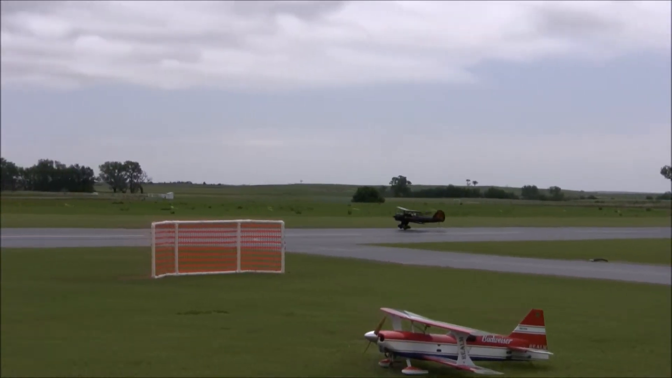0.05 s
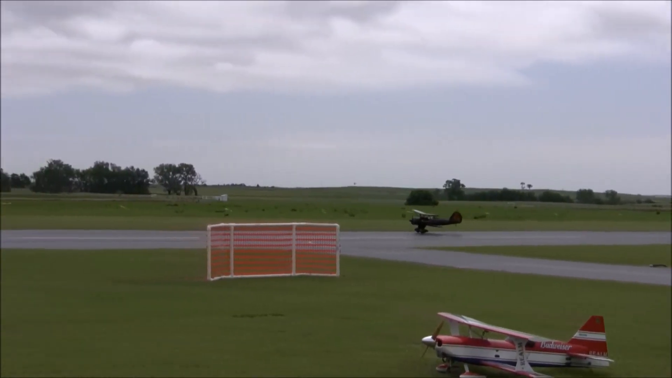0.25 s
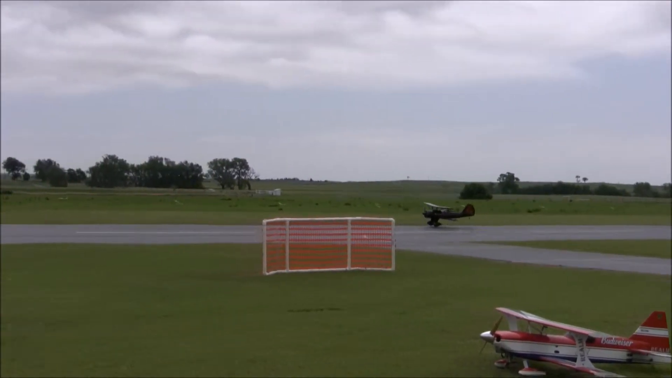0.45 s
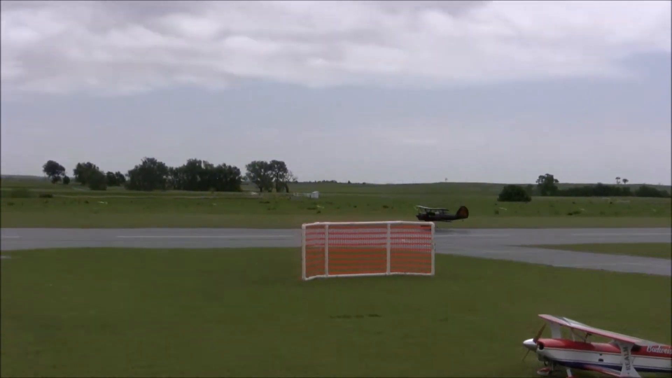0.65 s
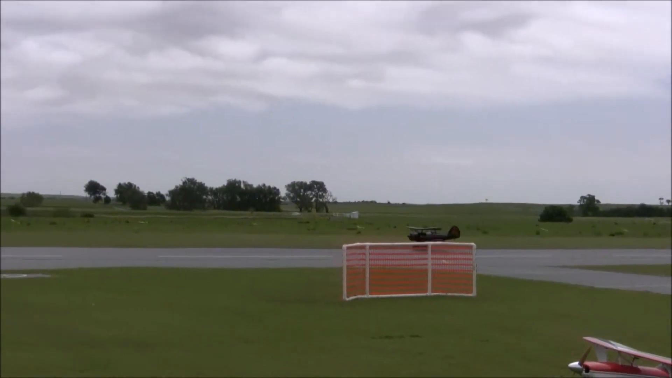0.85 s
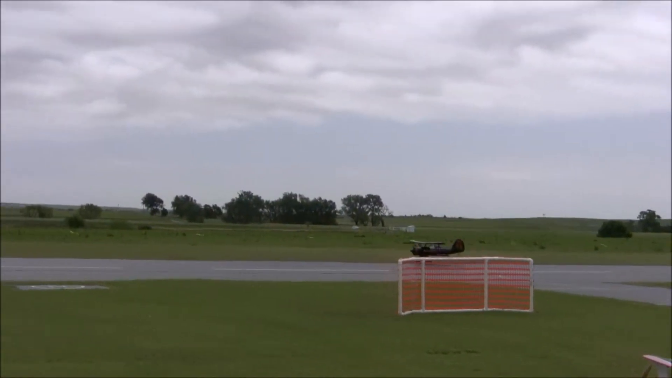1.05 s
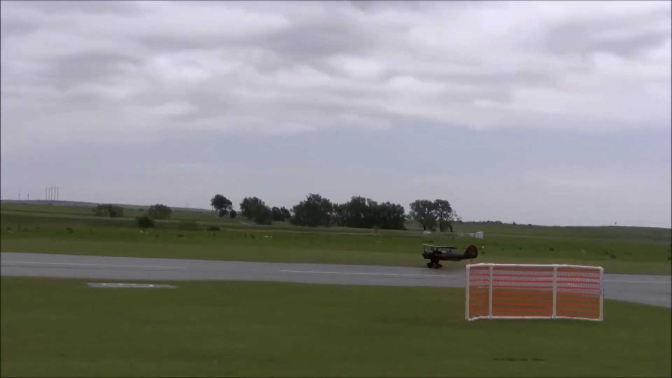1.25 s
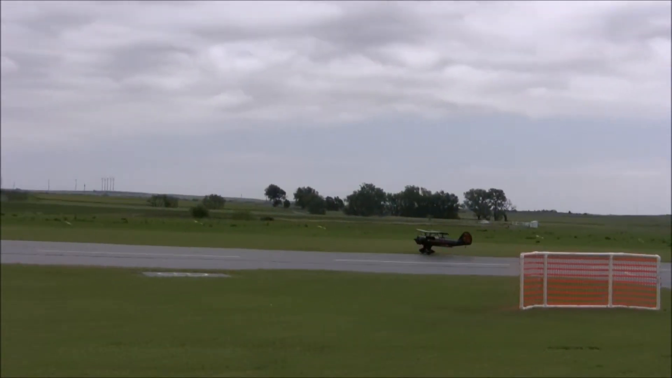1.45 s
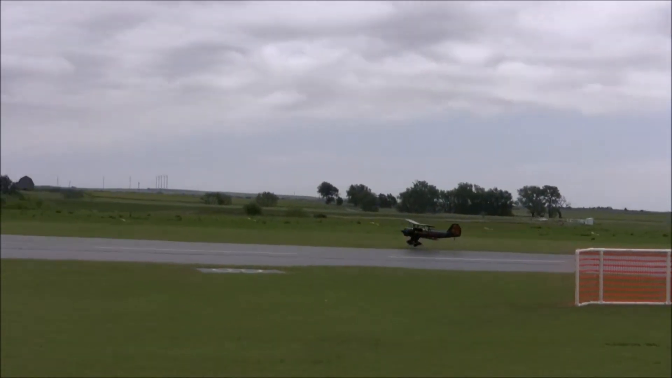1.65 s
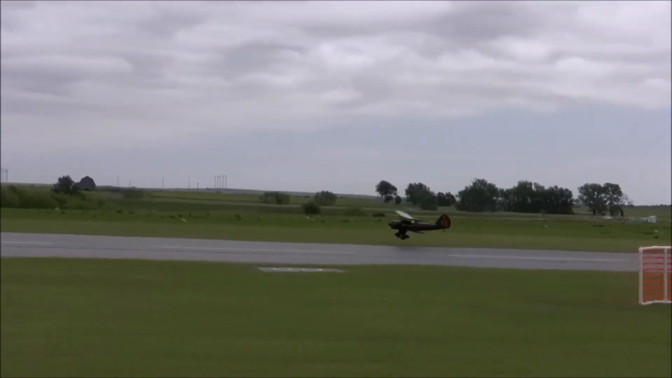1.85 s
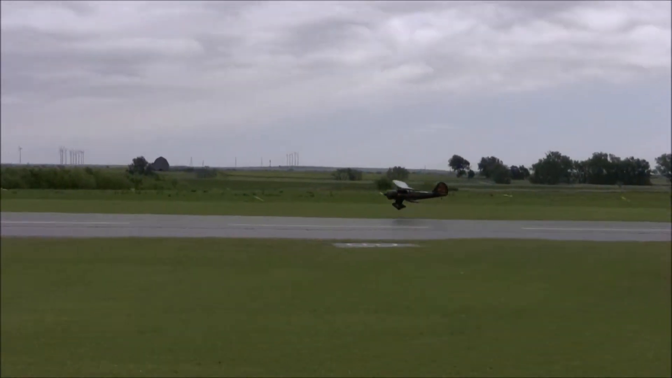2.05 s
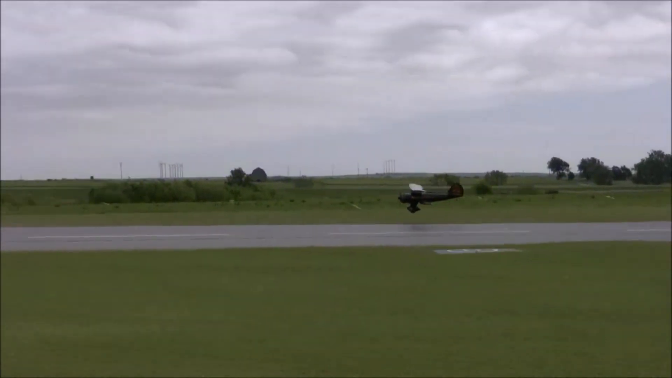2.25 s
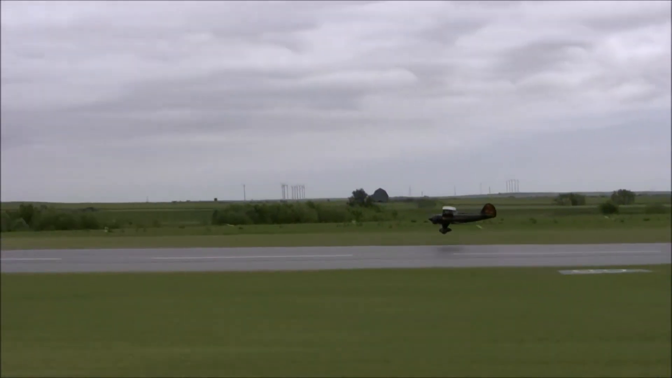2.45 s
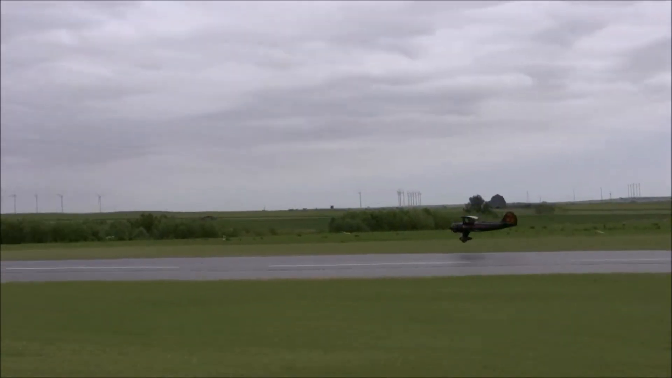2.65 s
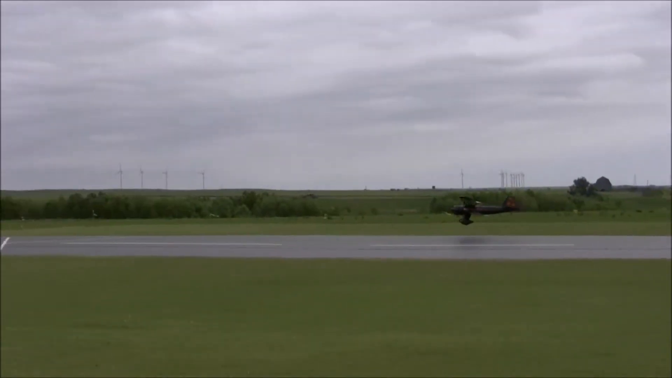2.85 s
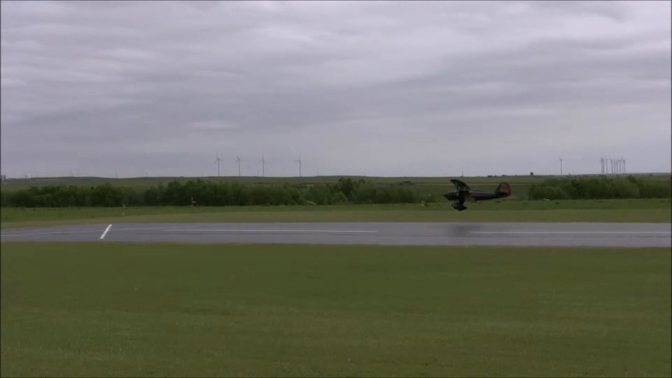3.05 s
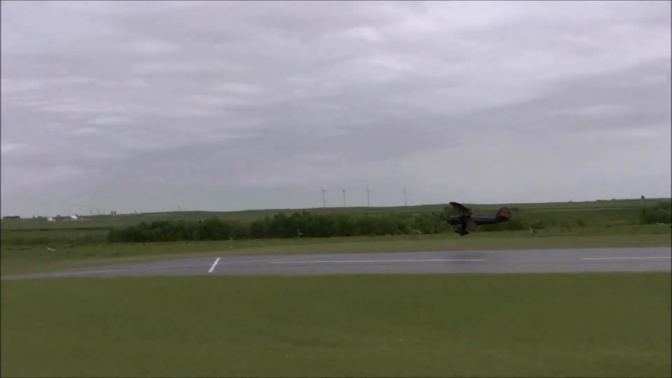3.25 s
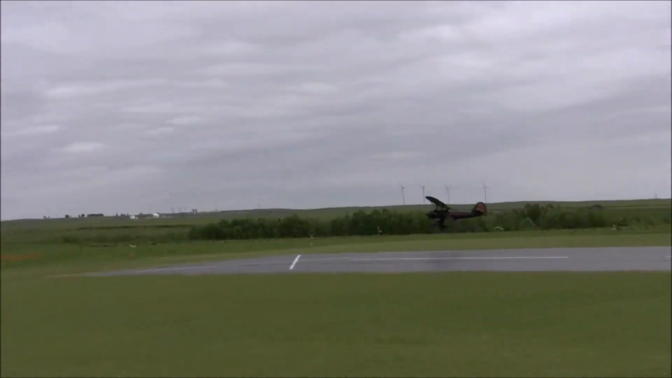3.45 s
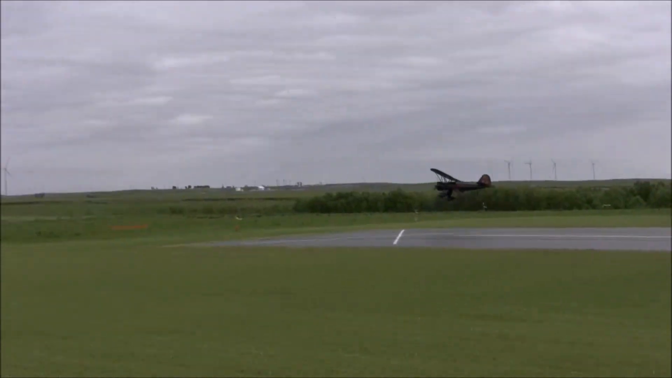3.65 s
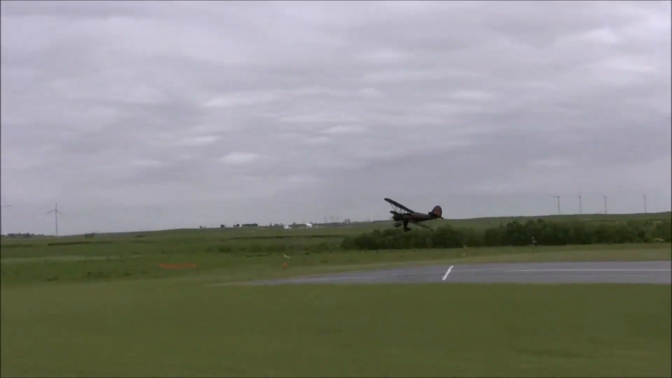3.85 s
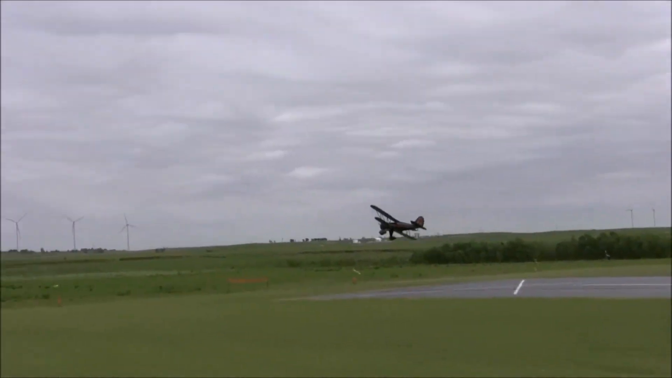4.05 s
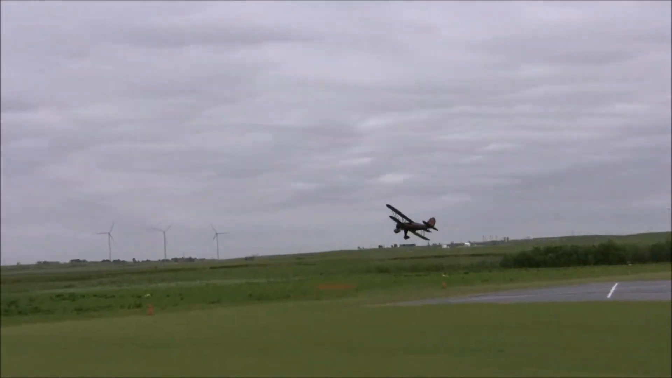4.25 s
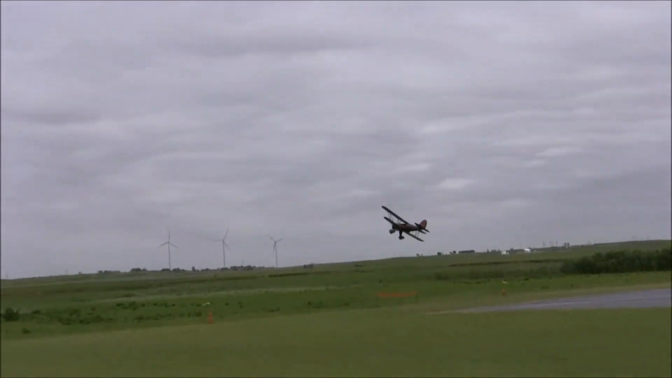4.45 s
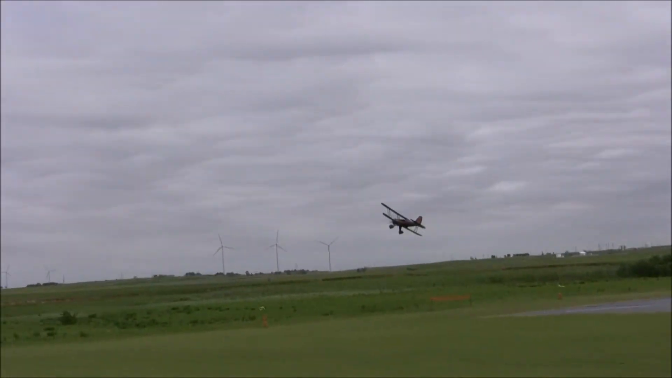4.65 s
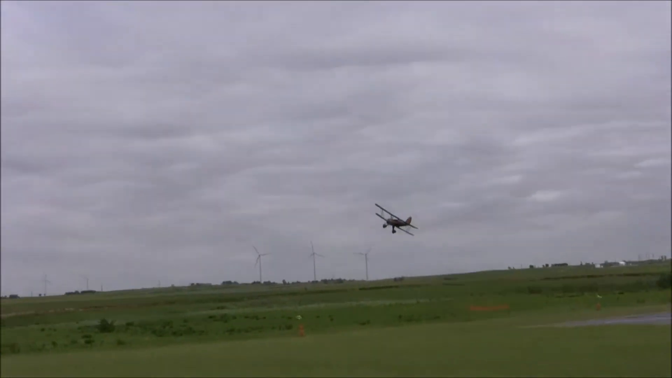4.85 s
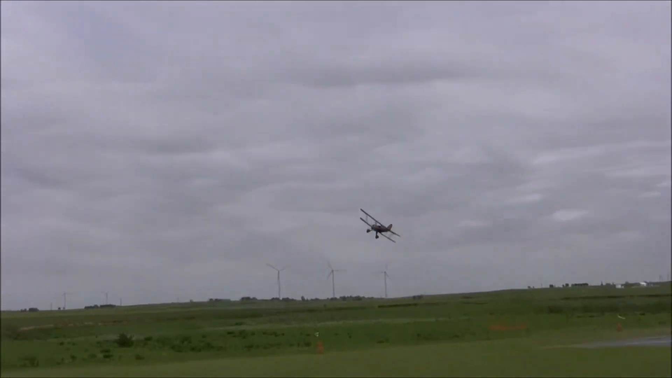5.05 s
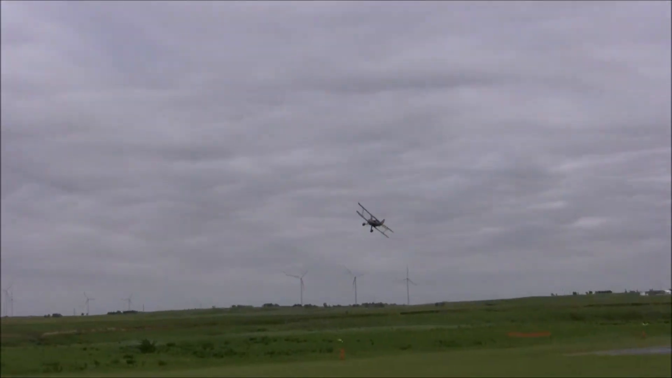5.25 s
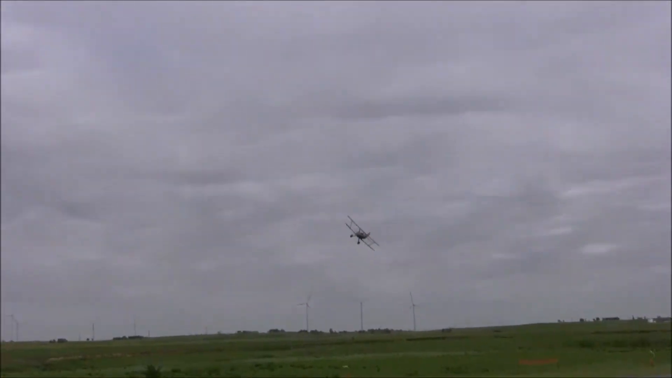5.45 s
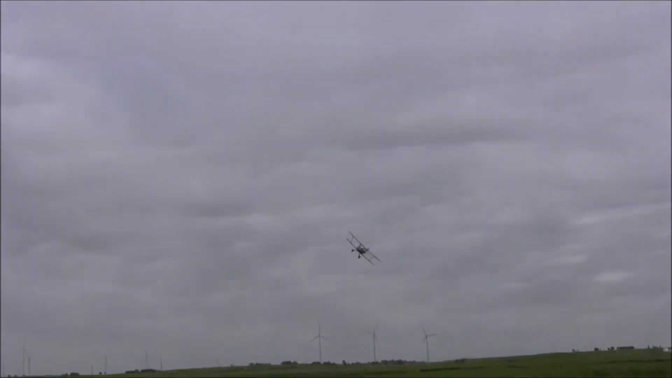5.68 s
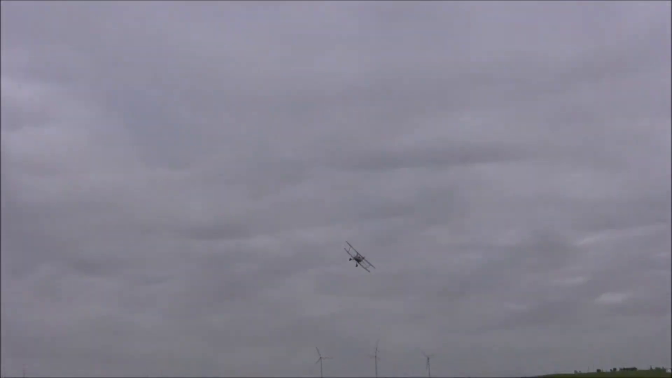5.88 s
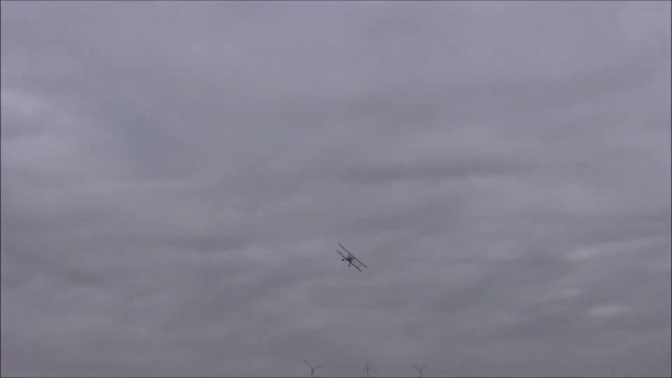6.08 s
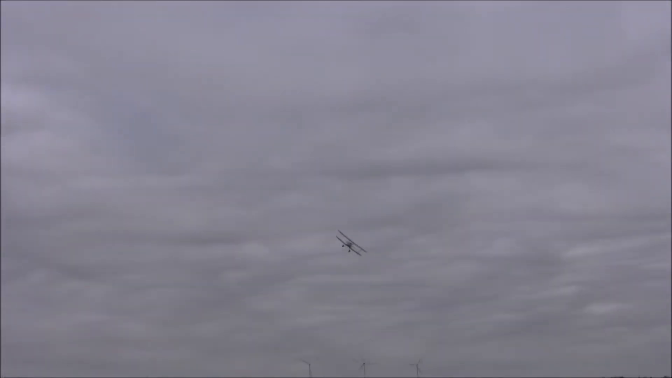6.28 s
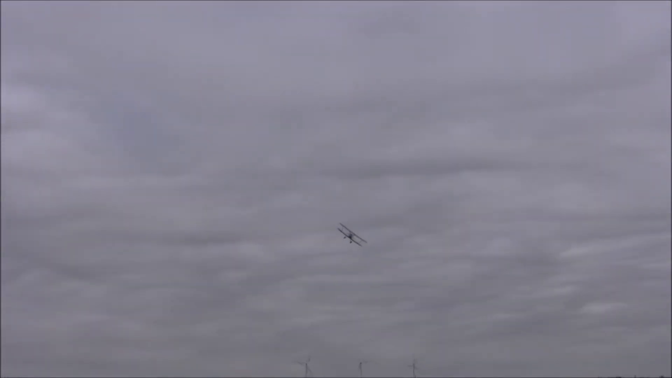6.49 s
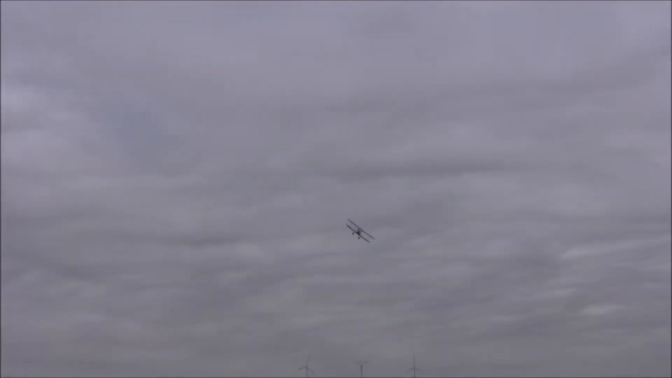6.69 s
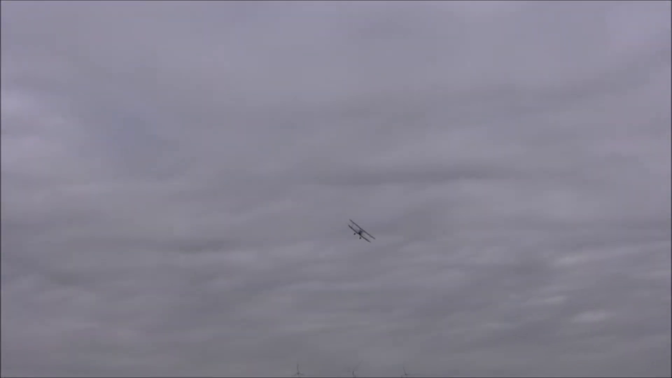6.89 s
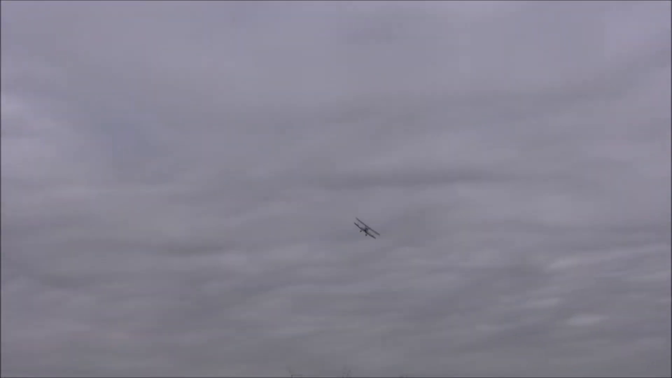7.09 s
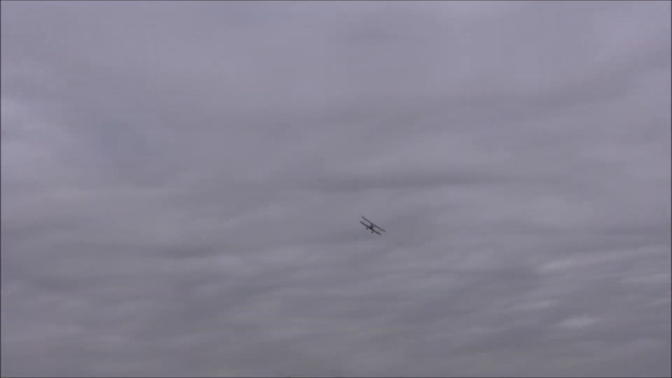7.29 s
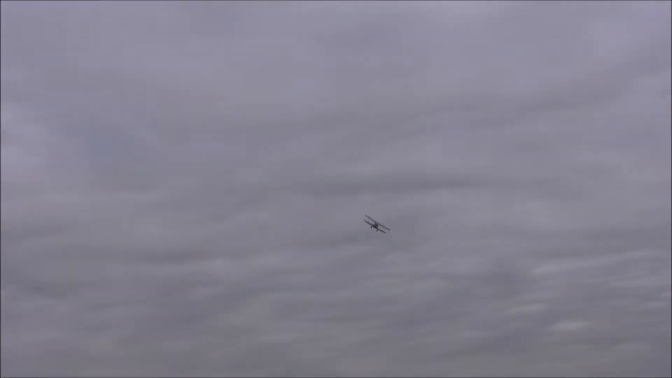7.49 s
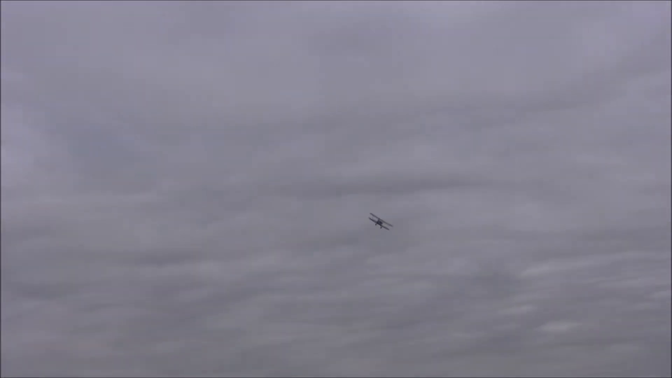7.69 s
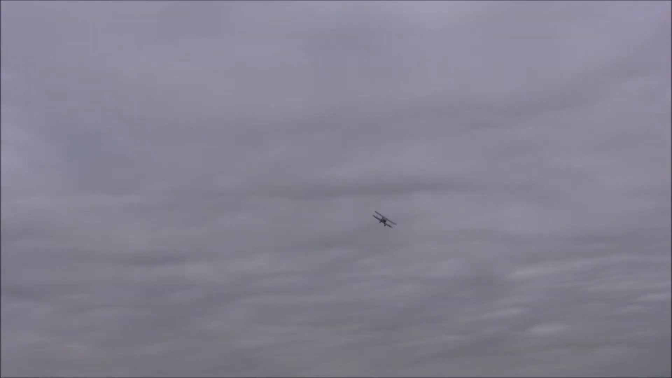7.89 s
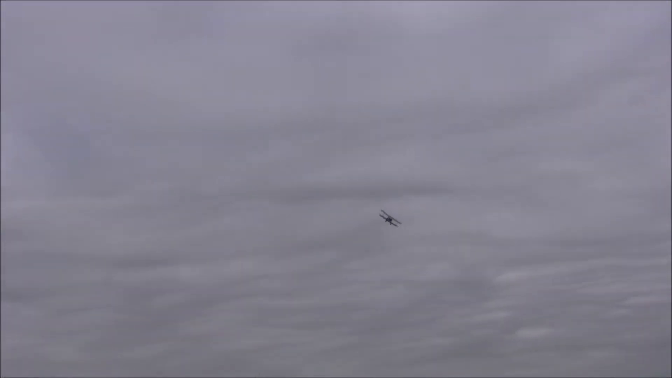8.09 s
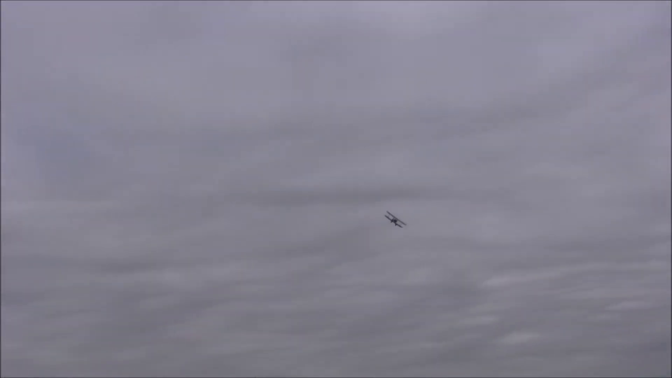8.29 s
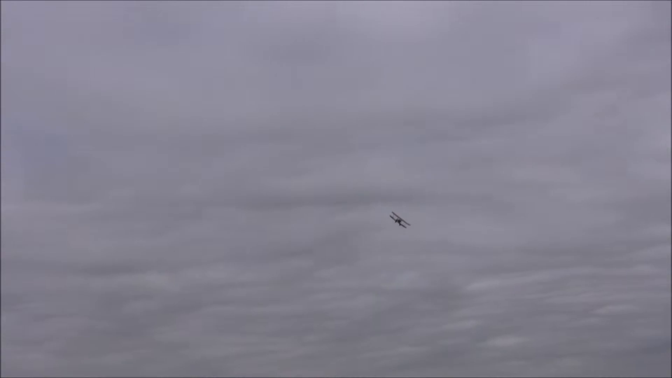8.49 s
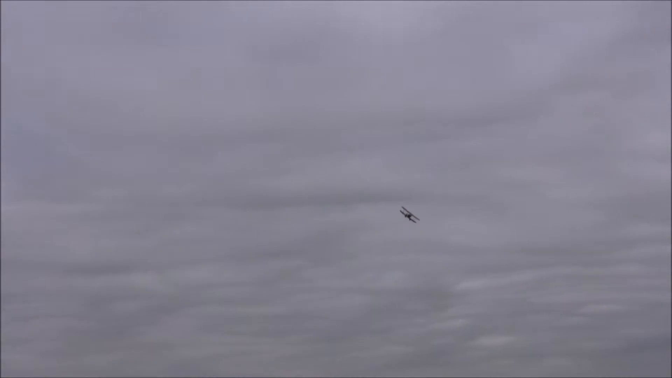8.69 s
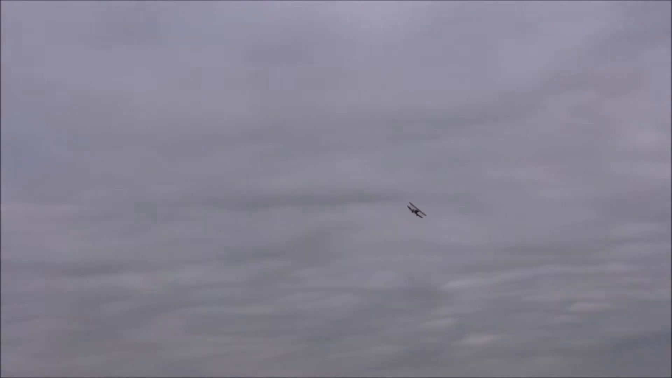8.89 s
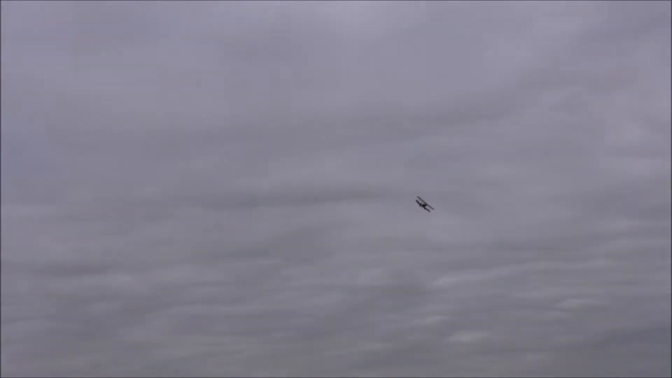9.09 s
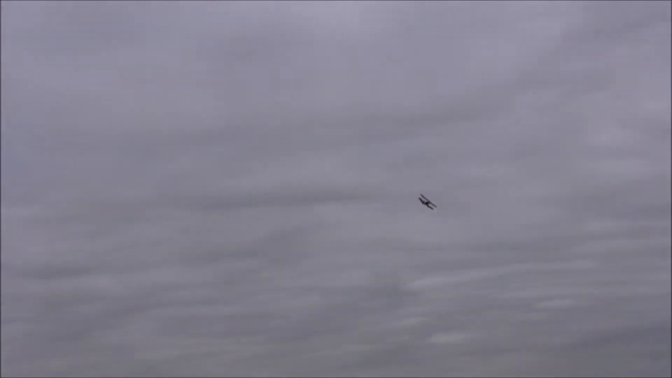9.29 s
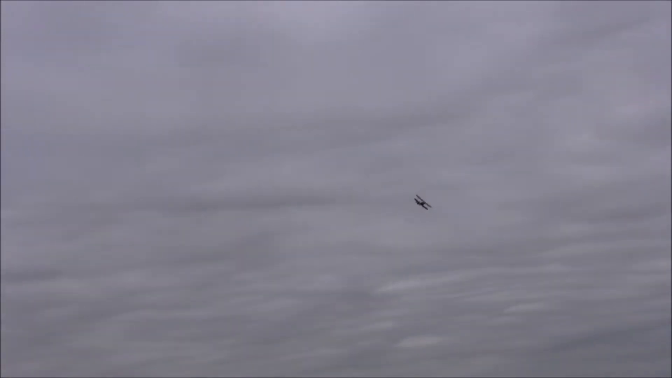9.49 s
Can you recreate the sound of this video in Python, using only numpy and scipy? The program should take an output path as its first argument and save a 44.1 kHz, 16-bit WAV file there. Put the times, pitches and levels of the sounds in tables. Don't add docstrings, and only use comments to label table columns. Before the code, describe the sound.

Outdoors on an open field, wind buffets the microphone while a small single-cylinder petrol engine putters faintly. Within a second it revs to a fast, steady buzz. The model plane rolls and lifts off, its raspy crackle and propeller drone loudest around three to five seconds, then it recedes to a thin hum under low lumpy wind rumble. One handheld stereo microphone near the runway.

```python
import sys
import numpy as np
from scipy import signal
from scipy.fft import rfft, irfft, next_fast_len
from scipy.io import wavfile
from scipy.ndimage import uniform_filter1d

SR = 44100
rng = np.random.default_rng(int(sys.argv[2]) if len(sys.argv) > 2 else 0)


def how_loud(loudness_db):
    steps = np.asarray(loudness_db, float) / 20
    return 10 ** steps


def dump_mix(stems):
    frames = np.atleast_2d(stems).T
    limited = np.clip(frames, -1, 1)
    pcm = np.round(limited * 32767).astype(np.int16)
    wavfile.write(sys.argv[1], SR, pcm)


N = 420273

# time in seconds [s], level [dB].
HUSH_DB = [(0, -40), (1.4, -39), (2.5, -38.5), (6, -34), (9.53, -33)]
# frequency [Hz], density [dB per Hz].
HUSH_SPECTRUM = [(35, -15), (60, -0.5), (229, -21), (324, -6), (400, -31), (564, -3), (1130, -12),
                 (2200, -19), (5060, -25.5), (12000, -43.5), (14500, -89)]

# start in seconds [s], length [s], level [dB].
GUSTS = [(0, 0.2, -31), (0.196, 0.23, -16.5), (0.496, 0.54, -20.5), (1.166, 0.12, -25), (1.516, 0.38, -24),
         (1.823, 0.17, -28), (2.04, 0.09, -28.5), (2.23, 0.01, -32), (2.308, 0.026, -38),
         (2.45, 0.098, -33.5), (2.59, 0.011, -27.5), (2.907, 0.037, -26.5)]
# frequency [Hz], density [dB per Hz].
GUST_SPECTRUM = [(24, -62), (40, -23.5), (160, -1), (200, -0.5), (385, 2), (798, -11.5), (910, -15.5),
                 (1140, -22.5), (2070, -38), (3500, -41), (7700, -120)]
# time in seconds [s], level [dB].
BREEZE_DB = [(0, -82), (2.3, -86), (3.4, -59), (4.2, -62), (5.2, -33.5), (6.0, -35), (7.0, -28),
             (8.2, -30.5), (9.53, -27.5)]
# frequency [Hz], density [dB per Hz].
BREEZE_SPECTRUM = [(12, -48), (20, -7), (91, 2), (248, -14), (282, -11.5), (331, -30), (376, -12),
                   (400, -4), (520, -33), (880, -120)]
# centre in seconds [s], swell [dB], length [s].
THUMPS = [(.24, 12, 0.034), (4.72, 16, 0.07), (5.15, 0, 0.072), (5.89, 6, 0.073), (6.18, 8, 0.043),
          (6.9, 1, 0.1), (7.25, 11, 0.044), (7.86, 3, 0.05), (8.2, 9, 0.04), (8.6, 1, 0.15),
          (8.9, -2, 0.062), (9.21, 7, 0.077), (9.37, 6.5, 0.056)]

# time in seconds [s], level [dB].
WHISTLE_DB = [(0, -80), (5, -67), (5.7, -24), (6.8, -32.5), (8.2, -38), (9.53, -46)]

# time in seconds [s], firings per second [Hz].
FIRING_HZ = [(0, 38), (.03, 40.3), (.354, 40.3), (.372, 15), (.39, 40.6), (.6, 40.6), (.63, 60), (.7, 79),
             (1.05, 85.5), (1.5, 87.8), (1.71, 90.7), (2.3, 92.2), (2.45, 91.3), (2.9, 93), (3.65, 92.5),
             (3.72, 91.7), (4.26, 92.5), (5.3, 92.1), (5.95, 93.3), (8.3, 93.5), (8.55, 94), (9.53, 93.7)]
# time in seconds [s], ground echo notch [Hz], echo strength [0-1], boom centre [Hz].
PATH = [(0, 596, 0, 805), (2, 585, 1, 892), (3.2, 528, 0.87, 917), (3.8, 483, 1, 853), (4.3, 333, 1, 826),
        (4.8, 301, 0.93, 713), (5.3, 290, 0.84, 661), (6.4, 250, 0.2, 613), (7.2, 164, 0, 540),
        (8, 144, 0.34, 610), (9.53, 164, 0.7, 755)]
# time in seconds [s], boom lead on crackle and propeller [turns], left over right [dB].
ATTITUDE = [(0, .36, .6), (2, .36, .2), (3.2, .36, 0), (3.9, .48, .4), (4.4, .36, .7), (5.4, .27, 1.3),
            (6.2, .18, 1.8), (7, 0, 2.8), (7.7, 0, 3.1), (8.7, 0, 2.7), (9.53, 0, 2)]

# time in seconds [s], exhaust [dB], propeller [dB], muffler boom [dB].
TONES_DB = [(0, -38, -48, -72), (.7, -70, -69, -42), (1.0, -55, -31.5, -53), (1.5, -45.5, -27.5, -39.5),
            (2.2, -52, -28, -37), (2.85, -40, -14.5, -31.5), (3.2, -38, -14, -30.5), (3.6, -40, -15, -25),
            (3.9, -38.5, -16.5, -20.5), (4.23, -39, -19.5, -11), (4.37, -37, -21.5, -17.5),
            (4.6, -30.5, -16.5, -13), (5.1, -38, -20.5, -12.5), (5.6, -33, -24, -21),
            (6.4, -33.5, -29.5, -43), (7.4, -32, -34, -41), (8.1, -33, -27, -34), (9.53, -35, -27, -33.5)]
# order [multiple of firing rate], level [dB].
EXHAUST_ORDERS = [(1, 2), (2, -8), (3, 6), (4, 3), (5, 7.5), (6, 8), (7, -4), (8, -6.5), (9, -2), (10, -2),
                  (11, -15), (12, -71), (13, -40), (14, -13)]
# order [multiple of firing rate], level [dB].
PROPELLER_ORDERS = [(2, -1), (3, -5.5), (4, -3.5)]
# time in seconds [s], share [ratio].
BOUNCE = [(0, .15), (3.2, .2), (3.6, 2.5), (4.0, 2.5), (4.2, .8), (4.45, 0), (9.53, 0)]

# time in seconds [s], level [dB], brightness [dB].
CRACKLE_DB = [(0, -55, 4), (.3, -56, 9.5), (.62, -50, -3.5), (1.0, -48.5, 2), (1.33, -54, 7.5),
              (1.5, -40.5, 8), (2.1, -35, 2.5), (2.5, -25.5, -1.5), (2.9, -19, -7), (3.6, -21, -3.5),
              (4.6, -20.5, -5), (5.3, -25, -2), (6.0, -30, -6.5), (7.0, -55.5, -5), (7.7, -39.5, -10),
              (8.4, -34, 1), (8.75, -35.5, -6.5), (9.53, -38.5, -3.5)]
# level over crackle [dB], share of brightness [ratio], share of flares [ratio].
PARTS = [
    (-4, 0.11, 0.65),
    (1.5, 0.11, 0.85),
    (0.5, 0.93, 1),
    (-11, 1, 1),
]
# frequency [Hz], width [Hz], level [dB].
MUFFLER_MODES = [(1230, 69, 17.5), (1370, 107, 16.5), (1580, 210, 17.5), (1778, 58, 12.5), (1950, 45, 11.5),
                 (2117, 29, 8)]
# frequency [Hz], width [Hz], level [dB].
PIPE_MODES = [(2430, 130, -3.5), (2657, 88, -0.5), (2803, 100, -3), (2962, 180, -1.5), (3150, 114, -5),
              (3352, 94, -5), (3493, 106, -1.5), (3700, 130, -4.5), (3880, 270, -10), (4180, 230, -15.5)]
# frequency [Hz], width [Hz], level [dB].
COWL_MODES = [(4380, 200, -14), (4620, 115, -4.5), (4820, 89, -2), (5000, 89, -3.5), (5190, 156, -4),
              (5430, 74, -6), (5660, 190, -0.5), (6030, 230, -5), (6380, 300, -11)]
# frequency [Hz], density [dB per Hz].
JET_SPECTRUM = [(3820, -17), (6200, -2.5), (6940, 3), (8840, 1.5), (10700, 2.5), (11600, -1.5), (14500, -6),
                (15600, -12)]
# time in seconds [s], loudest frequency [Hz].
MUFFLER_LOBE_HZ = [(0, 1900), (2.5, 1800), (3.4, 1850), (3.8, 1950), (4.5, 1855), (5.0, 1690), (5.3, 1730),
                   (5.7, 1940), (6.3, 1900), (8, 1930), (9.53, 1900)]
# time in seconds [s], loudest frequency [Hz].
PIPE_LOBE_HZ = [(0, 3140), (.7, 3060), (1.6, 3240), (2.35, 3020), (3.45, 2840), (3.65, 3460), (4.0, 2860),
                (4.44, 3620), (4.75, 2830), (5.15, 3420), (5.74, 2800), (6.06, 3430), (6.2, 3150),
                (6.38, 2630), (7.72, 2550), (7.9, 3110), (8.9, 3130), (9.53, 2830)]
# time in seconds [s], loudest frequency [Hz].
COWL_LOBE_HZ = [(0, 4480), (.6, 4560), (.66, 5200), (2.75, 5170), (2.9, 4750), (3.25, 4620), (3.45, 4980),
                (3.7, 4860), (3.9, 4940), (4.5, 4840), (4.74, 5220), (4.95, 4850), (5.15, 5400),
                (5.3, 5000), (5.62, 5120), (5.9, 4860), (6.5, 5170), (7.8, 4880), (8.5, 4920), (8.95, 4830),
                (9.53, 5000)]
# centre in seconds
# [s], swell [dB], length [s].
FLARES = [(.39, -12, .012), (.158, 3, .012), (.5, 0.5, 0.027), (.575, 5, .025), (1.02, 0, 0.026),
          (1.09, -1, 0.022), (1.24, 1, .03), (1.62, -5, 0.016), (1.67, -2, 0.016), (.73, 15.5, 0.072),
          (.87, 10, 0.064), (1.17, 3, 0.045), (1.55, 4.5, 0.066), (2.02, 6.5, 0.035), (1.75, 2.5, 0.029),
          (1.87, 2.5, 0.0082), (1.94, 4.5, 0.014), (2.24, 3.5, 0.031), (2.34, 3.5, 0.045), (3.75, 1, 0.032),
          (4.55, 1, 0.099), (5.2, 2, 0.012), (2.62, 3, 0.04), (2.71, 4, 0.028), (2.81, 2.5, 0.039),
          (3.0, 2, 0.047), (3.24, 1.5, 0.066), (3.58, 3, 0.035), (4.09, 3, 0.051), (4.33, 3.5, 0.14),
          (4.76, 2, 0.16), (5.02, 1.5, 0.022), (5.4, 2, 0.038), (8.31, 3.5, 0.063), (7.9, 1.5, 0.22),
          (4.47, 2, .03), (4.62, 2, .03), (8.95, 1, 0.12), (9.3, 1.5, 0.048)]
# time in seconds [s], jitter [samples], luck per firing [dB], puff noise [ratio].
SCATTER = [(0, .2, 2.5, 1), (1.5, .25, 1.5, 1.1), (2.5, .25, 1, 1.1), (4, .4, 1.2, 1.25),
           (5.3, .4, 1.3, 1.2), (5.9, .2, .8, .75), (7.7, .1, .5, .45), (9.53, .1, .6, .5)]

# centre in seconds [s],
# frequency [Hz], swell [dB, negative for a dip], length [s].
GLINTS = [(0.15, 4530, -3, 0.026), (0.27, 4620, -4, 0.048), (0.54, 4600, 6, 0.071), (1.41, 3100, 10, 0.11),
          (1.44, 2070, 16, 0.87), (1.58, 4640, 1, 0.45), (1.62, 2630, 5.5, 1), (1.663, 1900, -18, 0.069),
          (1.66, 3730, 1, 0.13), (2.028, 6000, 2, 0.096), (2.057, 5030, 3, 0.1), (2.54, 1410, -13, 0.62),
          (2.61, 6100, 7, 0.51), (2.76, 3900, -1, 0.41), (3.31, 1990, 7, 0.35), (3.48, 2500, 1, 1.0),
          (3.53, 3080, -10.5, 0.14), (3.56, 4560, -2.5, 0.48), (3.59, 5830, 8, 0.17),
          (3.876, 1230, 10, 0.39), (4.035, 5330, 3, 0.13), (4.083, 1890, -25, 0.17), (4.37, 4580, 3, 0.084),
          (4.39, 2910, -9, 0.14), (4.39, 4100, 6, 0.31), (4.545, 1430, -21, 0.28), (4.555, 2070, 13, 0.079),
          (4.85, 3200, -7.5, 1.0), (4.99, 2590, 7, 0.08), (5.04, 1710, 11, 0.17), (5.095, 1410, 7.5, 0.047),
          (5.113, 3700, -4, 0.2), (5.22, 6470, -6.5, 1), (5.343, 3000, 6.5, 0.072), (5.397, 2430, -7, 0.19),
          (5.43, 2440, 0, 0.59), (5.56, 5460, 4, 0.14), (5.653, 2130, 11.5, 0.73), (5.686, 4340, 11, 0.95),
          (6.21, 2470, 0, 0.83), (6.45, 1280, -12, 1.0), (7.828, 1660, -8, 0.71), (8.38, 1230, -3, 0.17),
          (8.82, 1990, 7, 0.39), (8.86, 2470, 7, 0.6), (8.97, 2790, -14, 0.11), (9.07, 5300, 8, 0.14),
          (9.14, 3080, -10, 0.4), (9.23, 3950, 13.5, 0.32),
          (2.27, 280, 6, 0.22), (3.19, 280, -5.5, 0.47), (3.19, 366, 5.5, 0.23),
              (3.458, 735, 9.5, 0.44), (3.548, 860, -16.5, 0.18), (4.18, 1110, -5, 1), (4.22, 950, -3, 0.3),
              (4.506, 1020, 8.5, 0.12), (4.542, 650, 5.5, 0.13), (4.66, 711, -7, 0.47),
              (4.857, 830, 2.5, 0.33), (5.03, 370, -5, 0.5), (5.25, 888, -14, 1), (5.28, 460, 7.5, 0.3),
              (5.51, 730, -10, 0.052), (5.51, 840, 15.5, 0.56), (5.59, 560, 9.5, 0.24),
              (5.7, 740, -19, 0.5), (5.89, 1096, 11, 0.76), (6.07, 654, 11.5, 0.29), (6.56, 830, -7, 0.43),
              (6.61, 560, 3.5, 0.29), (6.864, 457, -6.5, 0.94), (6.99, 282, -1, 1.0), (7.41, 370, 3, 0.87),
              (8.02, 654, -9, 0.25), (8.15, 740, -0.5, 1.0), (8.51, 460, -3, 0.23), (8.69, 282, 4.5, 0.59),
              (9.41, 560, -4.5, 0.31),
          (2.2, 5200, 1.5, 0.25), (3.09, 5200, 10.5, 0.33), (3.36, 1100, 3, 0.42), (2.34, 920, 7.5, 1),
               (6.55, 2620, 0, 0.22), (8.4, 4920, 2.5, 0.32), (8.45, 5530, 6.5, 0.33),
               (8.95, 4700, 9.5, 0.13), (8.2, 4000, 6, .3), (1.2, 870, 4, .4), (1.16, 3300, 9, 0.07),
               (0.57, 3000, -4, 0.098), (3.1, 4350, -13, 0.22), (3.3, 5930, 9, 0.093), (2.0, 5300, -2, .1),
               (6.6, 6400, 11, .06), (8.3, 6500, 2, .1), (5.9, 2260, 9, 0.22), (6.6, 5000, -1, .3),
               (9.4, 2900, 3.5, 0.13), (1.8, 4250, 3, .4), (2.6, 4200, 6, .2), (3.7, 4150, 6, .2),
               (3.65, 3400, -4, .1), (3.4, 3660, 3, .1), (5.6, 3500, 7, .15), (4.8, 2250, -8, .2),
               (6.58, 2600, 3, 0.18), (3.73, 1500, 3, 0.21)]


def rms_one(x):
    return x / np.sqrt(np.mean(x ** 2) + 1e-20)


def in_time(rows):
    time_s, *columns = np.transpose(rows)
    return [np.interp(np.arange(N) / SR, time_s, column) for column in columns]


def bumps(rows):
    t, out_db = np.arange(0, N, 64) / SR, 0
    for centre_s, db, length_s in rows:
        out_db = out_db + db * np.exp(-((t - centre_s) / max(abs(length_s), .01)) ** 2)
    return np.interp(np.arange(N) / SR, t, out_db)


def drift(rate_hz):
    r = np.exp(-32 * np.pi * rate_hz / SR)
    noise = rng.standard_normal(N // 16 + 4002)
    slow = signal.lfilter([1], [1, -2 * r, r * r], noise)[4000:]
    return np.interp(np.arange(N) / 16, np.arange(len(slow)), rms_one(slow - slow.mean()))


def coloured(spectrum, alike):
    hz, level_db = np.transpose(spectrum)
    size = next_fast_len(N)
    log_hz = np.log(np.maximum(np.arange(size // 2 + 1) * SR / size, 1))
    gain = how_loud(np.interp(log_hz, np.log(hz), level_db))
    mid, side = irfft(rfft(rng.standard_normal((2, size))) * gain, size)[:, :N]
    alike = np.clip(alike, -1, 1)
    return rms_one(np.sqrt(1 + alike) * mid + np.sqrt(1 - alike) * side * [[1], [-1]])


def resonate(x, hz, width_hz):
    r = np.exp(-np.pi * width_hz / SR)
    zeros = np.array([1, 0, -1]) * (1 - r * r) / 2
    return signal.lfilter(zeros, [1, -2 * r * np.cos(2 * np.pi * hz / SR), r * r], x)


def butter(x, order, hz, kind="low"):
    return signal.sosfilt(signal.butter(order, hz, kind, fs=SR, output="sos"), x)


def delayed(x, late_samples):
    return np.array([np.interp(np.arange(N) - late_samples, np.arange(N), side) for side in x])


def glints(hz):
    width_octaves = .115
    rows = []
    for centre_s, lobe_hz, db, length_s in GLINTS:
        share = np.exp(-(np.log2(hz / lobe_hz) / width_octaves) ** 2)
        rows.append((centre_s, db * share, length_s))
    return bumps(rows)


def field_hush():
    return how_loud(in_time(HUSH_DB)[0]) * coloured(HUSH_SPECTRUM, 0.78)


def gust_envelope():
    rise_db_per_s, fall_db_per_s = 237, 202
    t, power = np.arange(0, N, 64) / SR, 1e-7
    for start_s, length_s, db in GUSTS:
        rise_db = rise_db_per_s * np.maximum(start_s - t, 0)
        fall_db = fall_db_per_s * np.maximum(t - start_s - length_s, 0)
        power = power + how_loud(2 * (db - rise_db - fall_db))
    return np.interp(np.arange(N) / SR, t, np.sqrt(power))


def gust_buffeting():
    flutter_db = 2.5 + 0.71 * drift(21.0) + 2.0 * drift(180.0)
    gust = gust_envelope() * how_loud(flutter_db) * coloured(GUST_SPECTRUM, 0.89)
    return butter(gust, 2, 70, "high")


def breeze_rumble():
    lumps = how_loud([1.9 * drift(21.0) + 1.1 * drift(36.0) for side in range(2)])
    level_db = in_time(BREEZE_DB)[0] + bumps(THUMPS) + 2.8 * drift(3.1)
    return how_loud(level_db) * rms_one(lumps * coloured(BREEZE_SPECTRUM, -0.64))


def pipe_whistle(hz, width_hz):
    tone = resonate(resonate(rng.standard_normal(N), hz, width_hz), hz, width_hz)
    return how_loud(in_time(WHISTLE_DB)[0] + drift(23.0)) * rms_one(tone)


def crank():
    hz = in_time(FIRING_HZ)[0] * (1 + .0012 * drift(8.) + .0015 * drift(40.))
    return np.cumsum(hz) / SR, hz


def propeller_and_exhaust(turns, hz, boom_octaves, flutter_db, wide_db):
    exhaust_db, propeller_db, boom_db = in_time(TONES_DB)
    notch_hz, echo, centre_hz = in_time(PATH)
    rasp = 0.35 * np.exp(-(notch_hz / 346) ** 2)
    ahead, bounce = in_time(ATTITUDE)[0], in_time(BOUNCE)[0]
    uneven = rng.standard_normal(int(turns[-1]) + 2)
    firing = 1 + 0.22 * uneven[np.floor(turns + .5).astype(int)]
    blades_db, out = dict(PROPELLER_ORDERS), np.zeros((2, N))
    for order, level_db in EXHAUST_ORDERS:
        tone_hz = order * hz
        boom = how_loud(boom_db) * np.exp(-(np.log2(tone_hz / centre_hz) / boom_octaves) ** 2)
        boom = boom * firing * (1 + rasp * drift(112.0))
        back = np.clip(echo, 0, 1) / (1 + (tone_hz / 900) ** 2)
        comb = np.abs(1 + back * np.exp(-1j * np.pi * tone_hz / notch_hz))
        direct = np.hypot(how_loud(exhaust_db + level_db), how_loud(propeller_db + blades_db.get(order, -99)))
        direct = direct * comb * (1 + 0.076 * drift(48.0))
        swirl_db = glints(order * 93) + flutter_db * drift(3.4 + 0.28 * order)
        swirl_db = swirl_db + wide_db * np.sqrt(order / 6) * drift(0.5) * [[1], [-1]]
        if order < 5:
            height = (direct + boom) * np.exp(1j * ahead * (3.6 - order * (2 * np.pi + 3.1)))
        else:
            boom = boom / np.hypot(1, bounce)
            pulse = (direct + bounce * boom) * np.exp(-2j * np.pi * order * ahead)
            from_centre = np.clip(order - centre_hz / hz, -3, 3)
            height = pulse + boom * np.exp(.9j * ahead * from_centre ** 2)
        phase = 2 * np.pi * order * turns + .2 * drift(3.)
        out += how_loud(swirl_db) * np.real(height * np.exp(1j * phase))
    return np.sqrt(2) * out


def gas_jet(since_s, number, strength, flow, idle, level_db):
    spit_s, spread_db = 0.0015, 4.5
    spit = strength * np.exp(-((since_s - spit_s) / spit_s) ** 2)
    jet = rms_one((spit + 0.84 * flow) * coloured(JET_SPECTRUM, 0.63))
    luck = rng.standard_normal((number[-1] + 1, 2))[number].T
    low_luck, top_luck = how_loud(spread_db * spit.clip(0, 1) * luck)
    low, top = butter(jet, 4, 9000), butter(jet, 4, 9000, "high")
    kept = np.clip((in_time(PATH)[0] - 150) / 250, .02, 1)
    top = kept * top + (1 - kept) * 0.069 * butter(top, 6, 11500)
    return how_loud(level_db + 20.0 * idle + 2.0 * drift(11.0)) * (low * low_luck + top_luck * top)


def ringing_part(drive, modes, lobe_hz, level_db, number, idle, patchy_db, wide_db):
    jitter_samples, luck_db, _ = in_time(SCATTER)
    rolling = np.clip((in_time(PATH)[0] - 540) / 30, 0, 1)
    rings = plain = 0
    for f, width_hz, mode_db in modes:
        lobe_db = (11 + 7.1 * idle) * np.exp(-((f - lobe_hz) / (80 + 0.036 * f)) ** 2)
        lobe_db = lobe_db + luck_db * rng.standard_normal(number[-1] + 1)[number]
        lobe_db = lobe_db + 12 * rolling * np.exp(-((f - 3790) / 260) ** 2)
        aside_db = wide_db * np.sqrt(f / 3000) * drift(1.1) * [[1], [-1]]
        late_samples = rng.uniform(10, 85) + 1.5 * drift(2.) + jitter_samples * drift(25.)
        ring = resonate(resonate(drive, f, 9.3 * width_hz), f, width_hz)
        ring = how_loud(mode_db + lobe_db + patchy_db * drift(2.6) + aside_db) * delayed(ring, late_samples)
        plain = plain + ring
        rings = rings + how_loud(glints(f)) * ring
    even = np.sqrt(uniform_filter1d(np.mean(plain ** 2, axis=0), size=6000))
    return how_loud(level_db) * rings / even


def exhaust_crackle(turns, hz, puff_s, patchy_db, wide_db):
    turns = turns + 1.2 - in_time(ATTITUDE)[0]
    since_turns, number = turns % 1, turns.astype(int)
    since_s = since_turns / hz
    flow = (hz / 93) ** 2
    idle = np.clip(.7 - flow, 0, 1)
    strength = how_loud((.7 + 3 * idle) * rng.standard_normal(number[-1] + 1)[number])
    clicks = (np.diff(number, prepend=number[0]) > 0) * strength
    gate = strength * np.exp(-since_s / puff_s) + .3 * np.exp(-((since_turns - .5) / .13) ** 2) * flow
    puff = in_time(SCATTER)[2]
    white = coloured([(20, 0), (2e4, 0)], .6)
    drive = how_loud(33.5) * clicks + puff * (gate + .22 * flow) * white

    heard_db, bright_db = in_time(CRACKLE_DB)
    flare_db = bumps(FLARES)
    *levels_db, jet_db = [heard_db + db + bright * bright_db + flares * flare_db
                          for db, bright, flares in PARTS]
    out = gas_jet(since_s, number, strength, flow, idle, jet_db)
    all_modes = MUFFLER_MODES, PIPE_MODES, COWL_MODES
    lobes = MUFFLER_LOBE_HZ, PIPE_LOBE_HZ, COWL_LOBE_HZ
    for modes, lobe, level_db in zip(all_modes, lobes, levels_db):
        out += ringing_part(drive, modes, in_time(lobe)[0], level_db, number, idle, patchy_db, wide_db)
    return out


def scene():
    background = field_hush() + gust_buffeting() + breeze_rumble()
    turns, hz = crank()
    plane = pipe_whistle(hz=614, width_hz=32)
    plane = plane + propeller_and_exhaust(turns, hz, boom_octaves=0.3, flutter_db=.6, wide_db=0.35)
    plane = plane + exhaust_crackle(turns, hz, puff_s=.016, patchy_db=.9, wide_db=2.0)
    pan_db = in_time(ATTITUDE)[1]
    return background + plane * how_loud([pan_db / 2, -pan_db / 2])


def roll_off(x):
    return signal.sosfilt(signal.butter(12, 15760, fs=SR, output="sos"), x)


def record(dry):
    mix = 1.438 * np.tanh(dry / 1.908)
    return roll_off(mix)


dry = scene()
out = record(dry)
dump_mix(out)
```